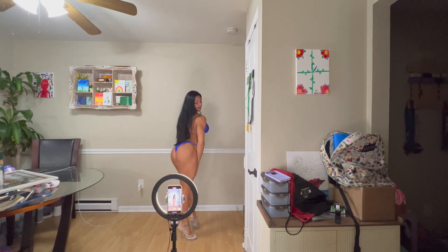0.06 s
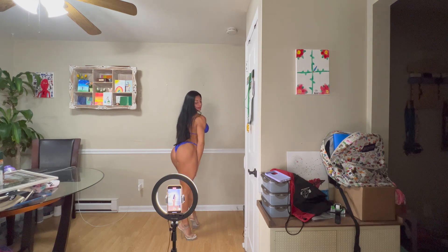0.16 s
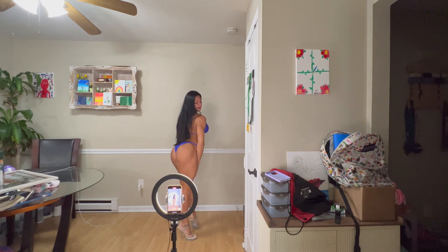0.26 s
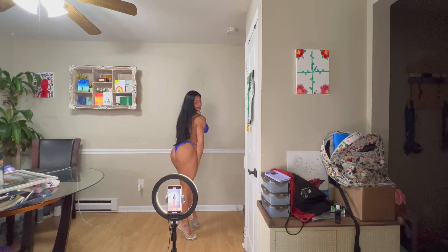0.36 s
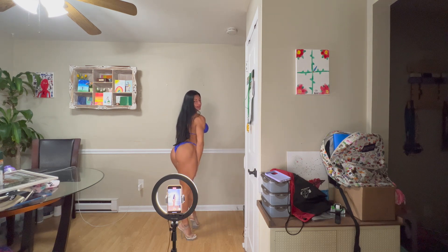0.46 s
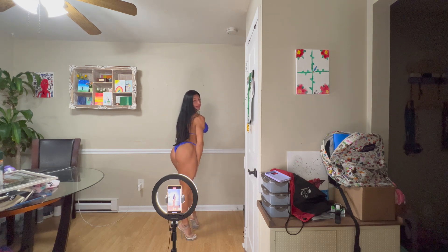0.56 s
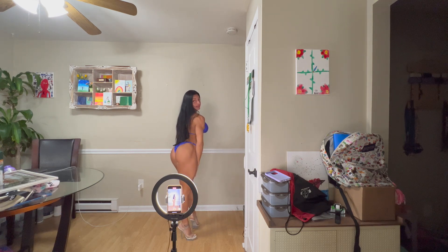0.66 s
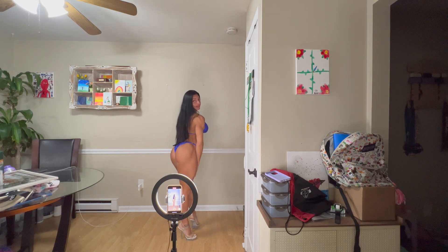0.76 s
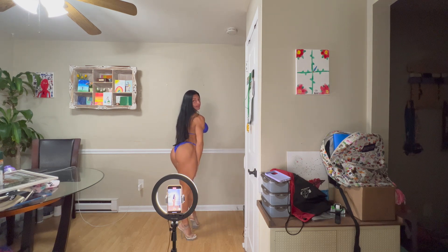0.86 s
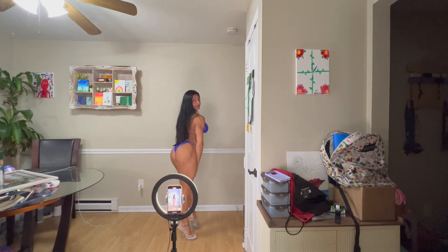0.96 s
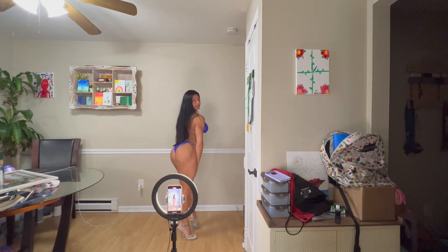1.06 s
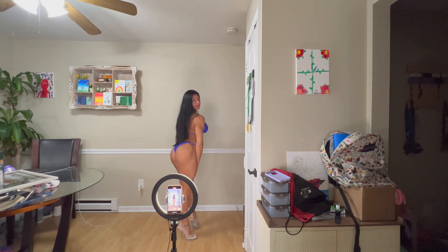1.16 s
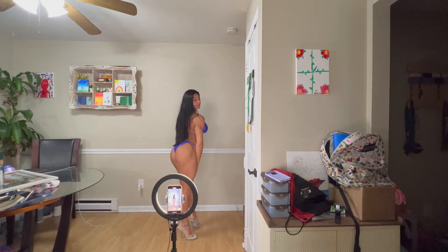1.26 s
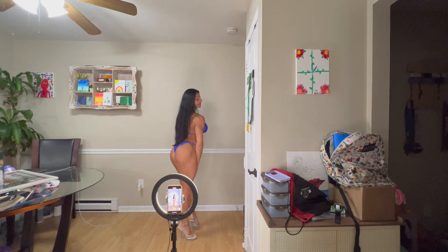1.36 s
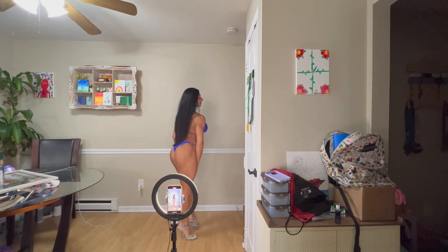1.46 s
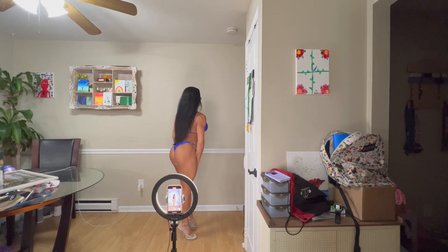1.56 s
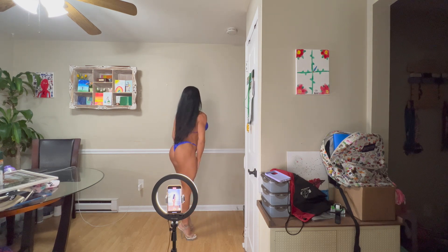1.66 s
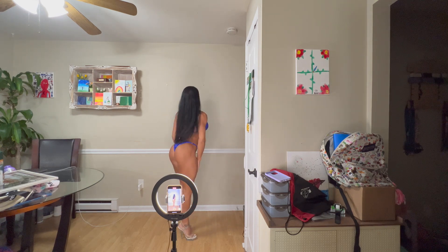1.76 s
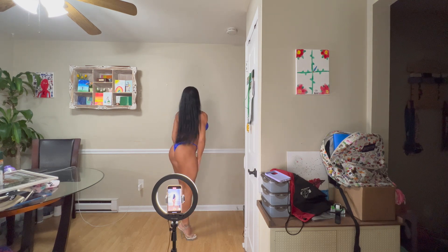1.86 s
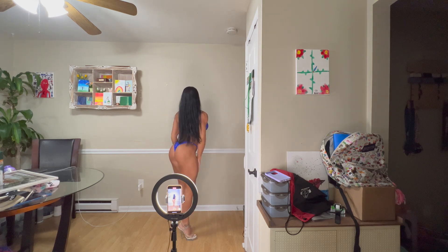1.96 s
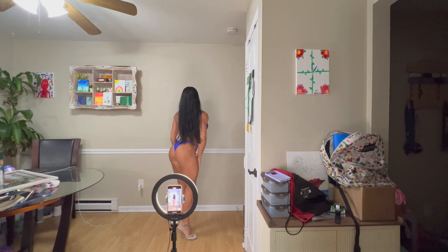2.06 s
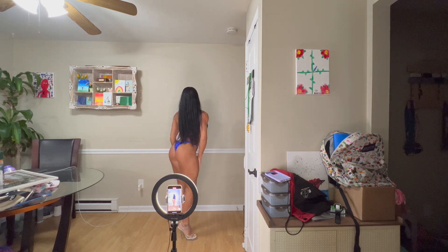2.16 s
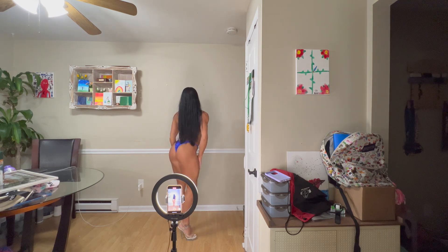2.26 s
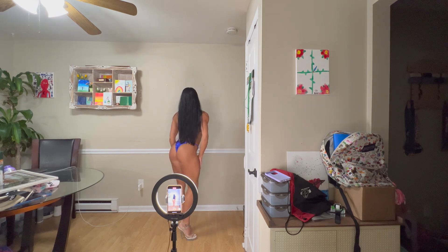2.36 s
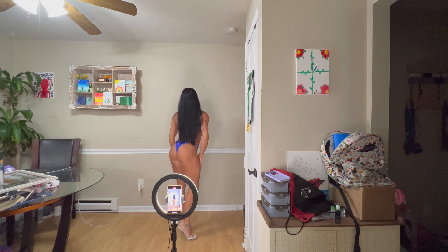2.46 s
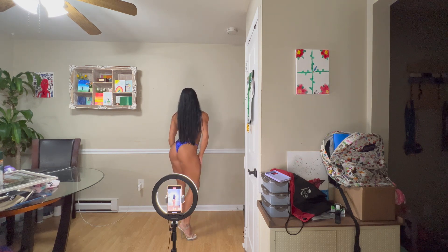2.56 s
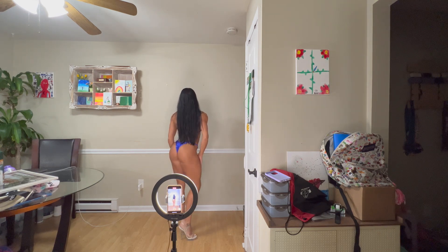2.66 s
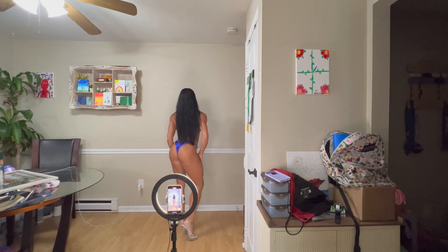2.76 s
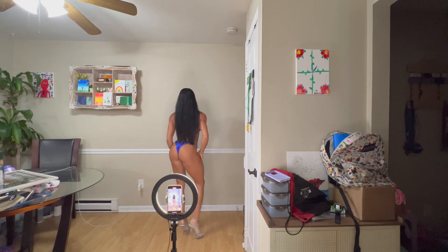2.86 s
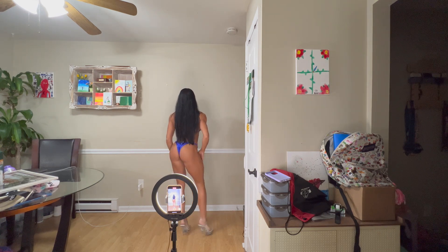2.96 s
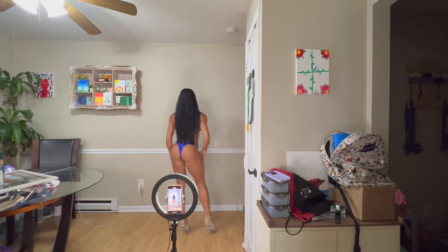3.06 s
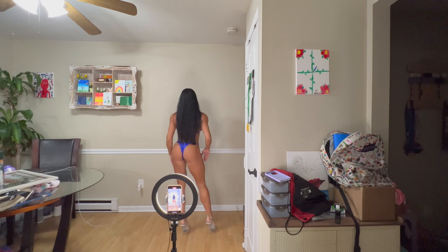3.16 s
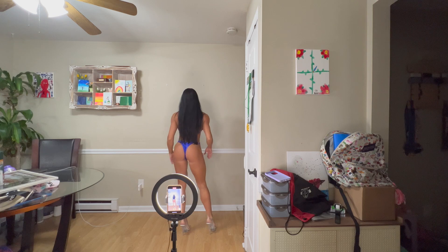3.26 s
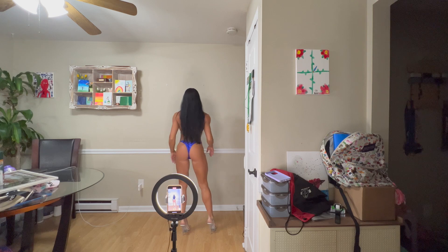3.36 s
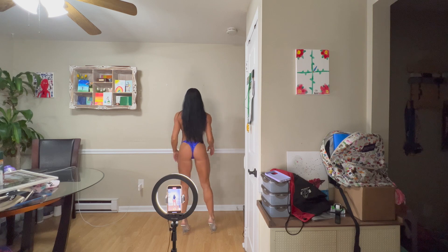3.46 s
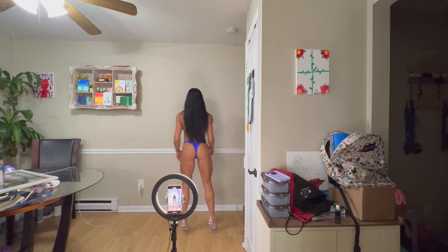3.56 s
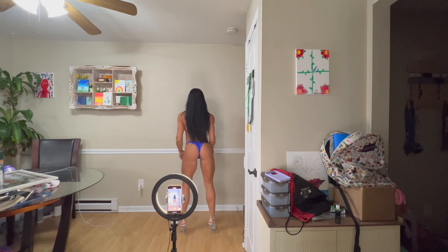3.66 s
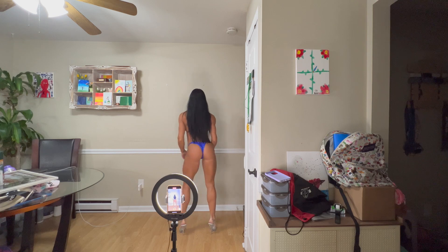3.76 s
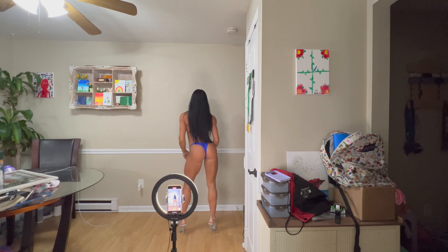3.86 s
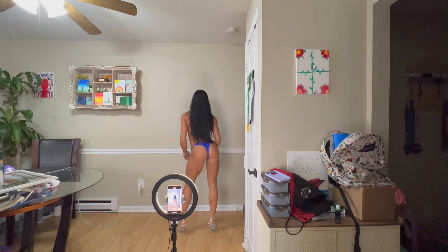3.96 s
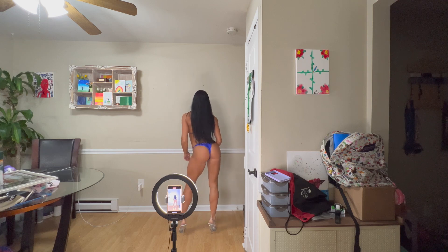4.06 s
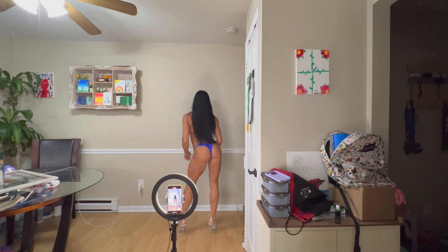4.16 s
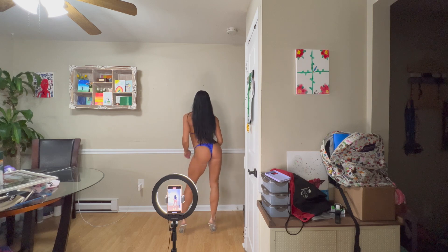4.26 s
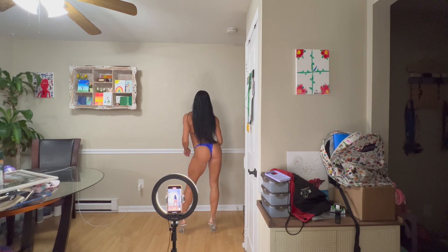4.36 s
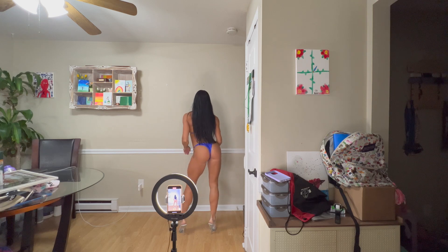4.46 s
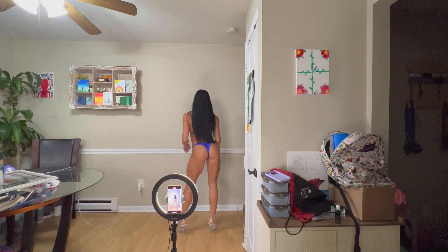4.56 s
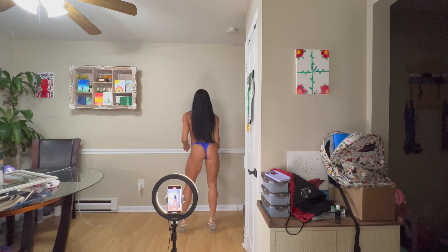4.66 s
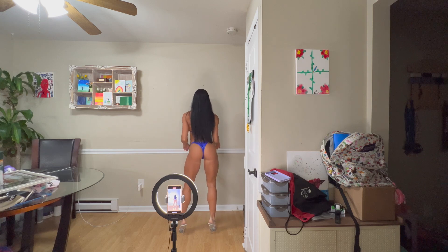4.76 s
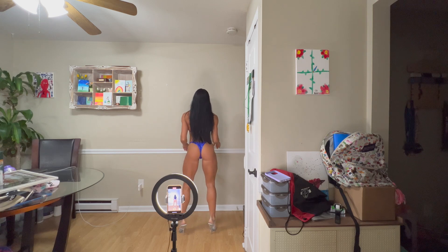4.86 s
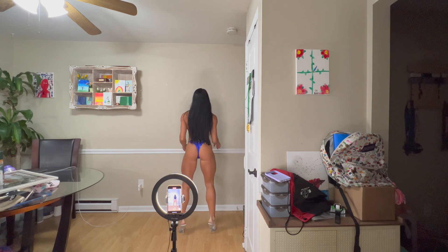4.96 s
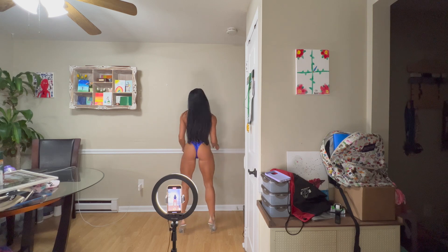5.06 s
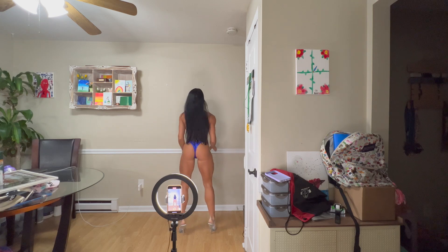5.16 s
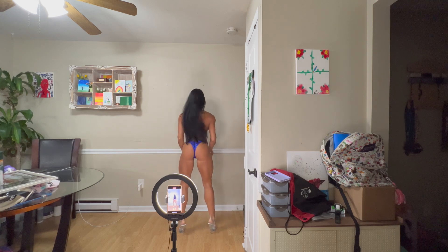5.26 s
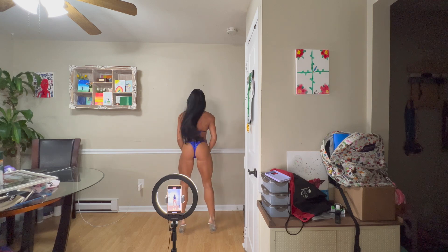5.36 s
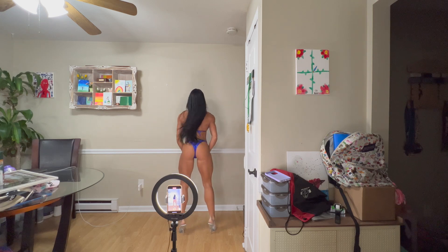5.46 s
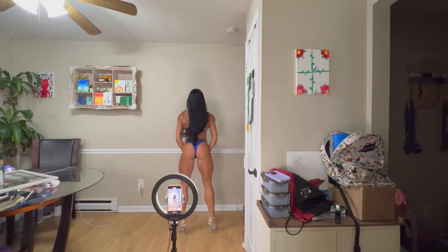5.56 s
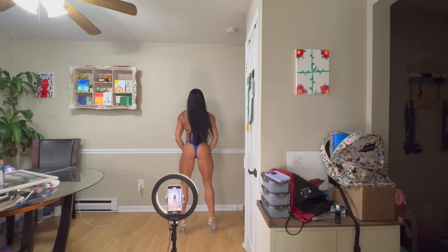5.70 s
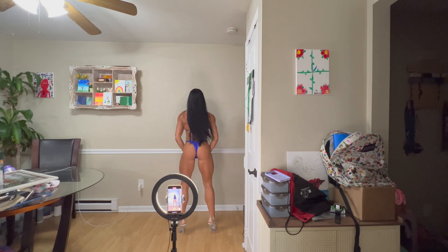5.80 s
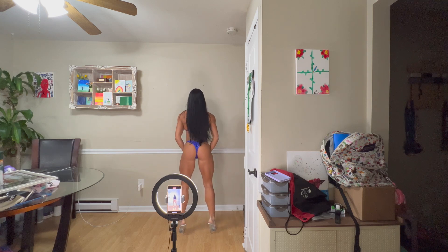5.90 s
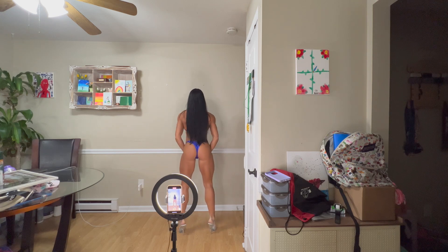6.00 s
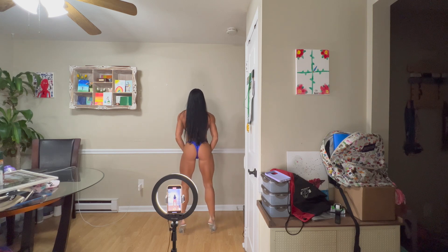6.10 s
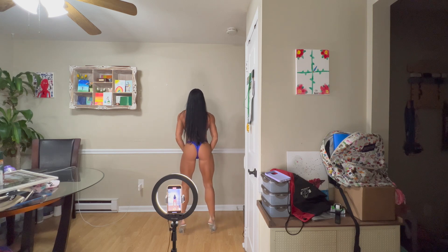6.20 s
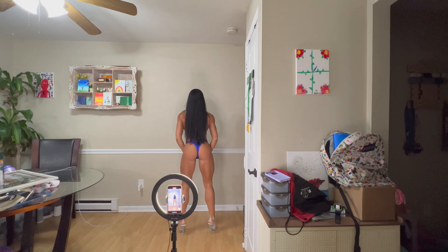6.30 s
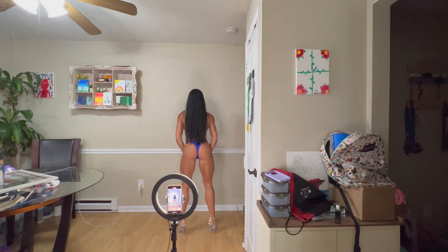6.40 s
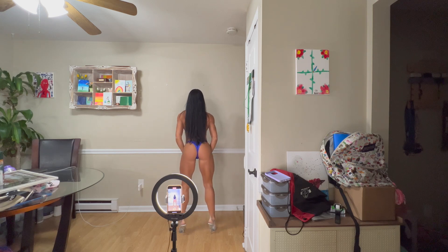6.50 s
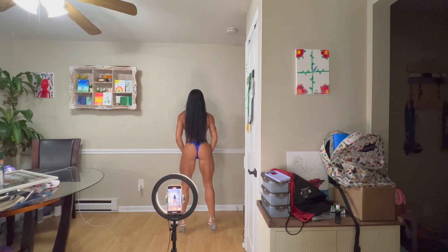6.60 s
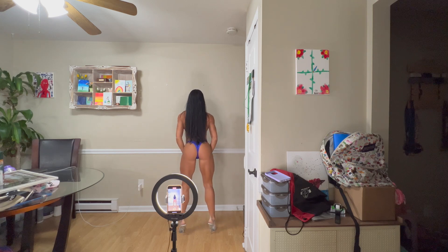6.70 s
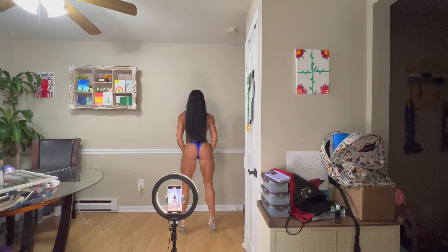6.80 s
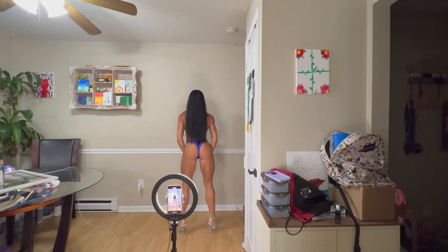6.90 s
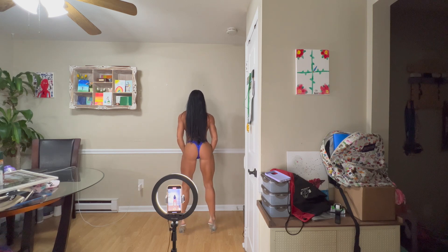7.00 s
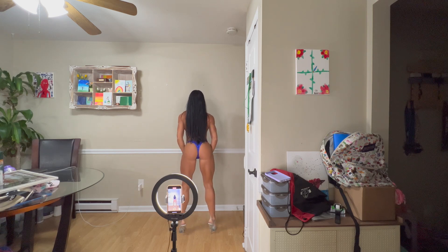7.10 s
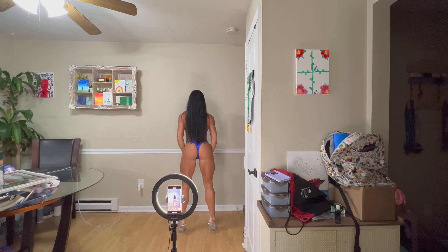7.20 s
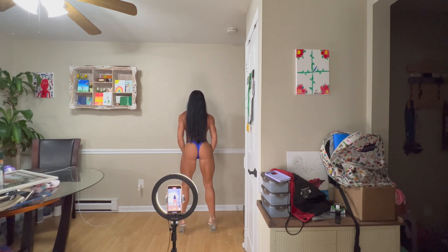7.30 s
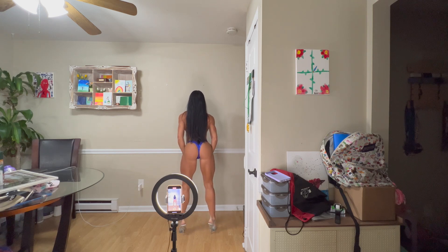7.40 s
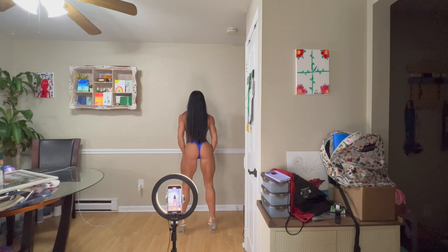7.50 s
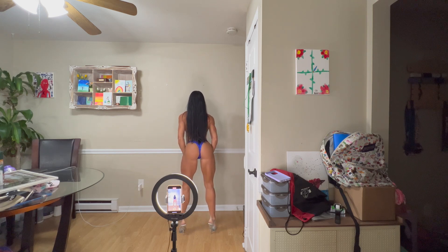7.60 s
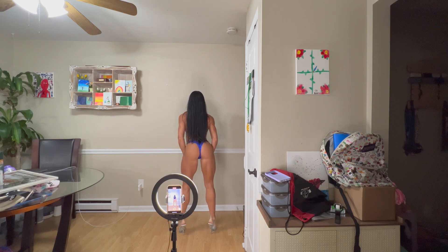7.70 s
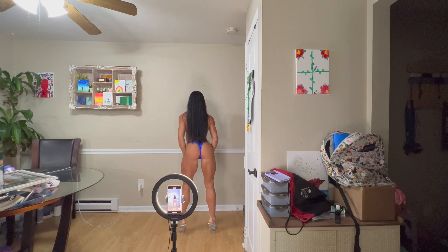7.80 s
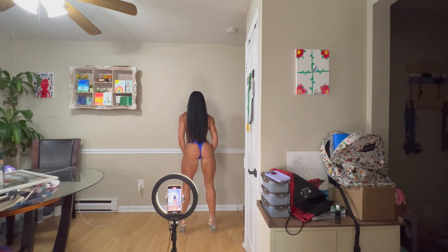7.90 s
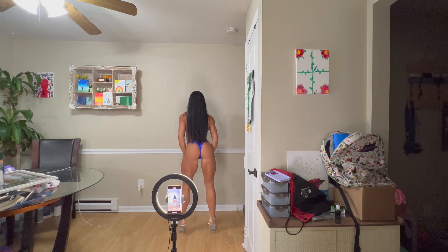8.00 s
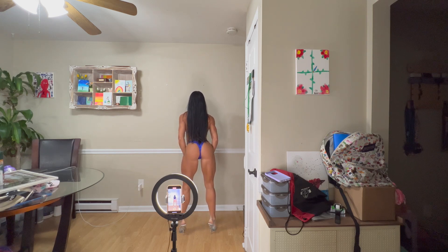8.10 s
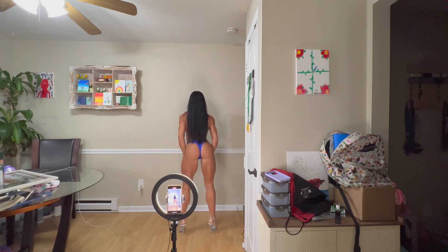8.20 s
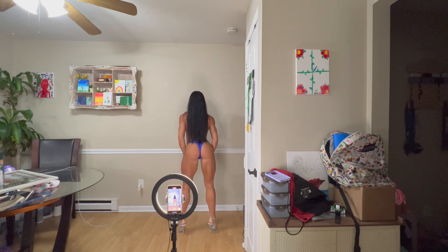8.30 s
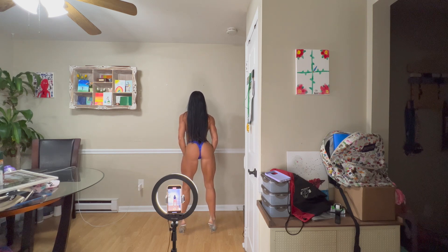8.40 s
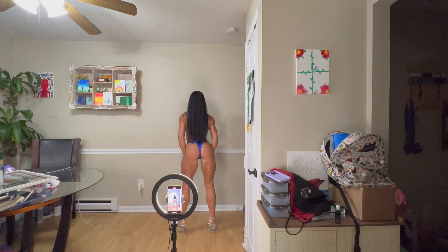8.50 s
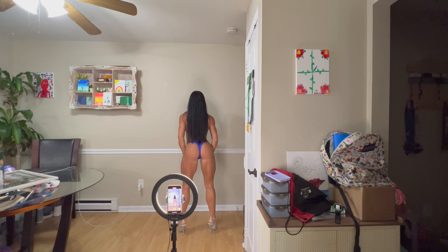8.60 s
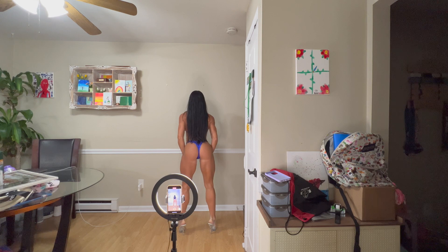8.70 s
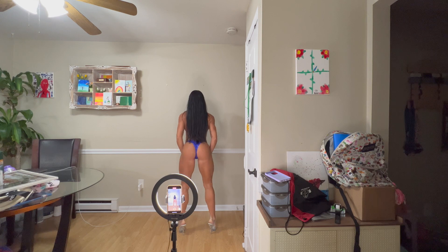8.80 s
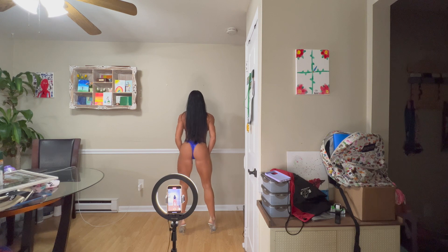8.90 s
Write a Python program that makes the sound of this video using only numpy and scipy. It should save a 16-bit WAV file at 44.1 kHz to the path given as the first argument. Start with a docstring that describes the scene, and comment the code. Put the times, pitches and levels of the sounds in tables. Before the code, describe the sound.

A furnished room with a hardwood floor, heard in stereo from a few metres. A wavering low mains hum, rumble and steady hiss run throughout, the hiss leaning right. Tiny thin squeaks come around 0.5 s, and a faint wall clock whirs and ticks every second from 0.6 s. A sole brushes softly at 1.3 s, with light heel contacts at 1.6-1.8 s. A sharp knock lands at 2.3 s, followed by gritty scuffing and short falling groans until about 3 s. A heavy, dull thud comes at 3.2 s, then a scrape at 3.5 s. Clicks cluster around 4.0-4.2 s and 4.9 s; the loudest knock hits at 5.3 s, with more at 5.7 s. Softer taps follow at 6.2 s, firmer ones at 7.0 and 7.5 s with a brief scuff, then faint touches at 8.1 and 8.6 s. A barely audible thin tone sounds at 8.9 s.

```python
"""A furnished room with a hardwood floor, high-heeled shoes a few metres from a stereo microphone.
From the start a mains hum wavers over a low rumble and a steady hiss, mostly louder on the right (tones, noise).
Brief thin tones come first (gliding sines), then a wall clock steps once a second (rattle on its modes).
Soon a sole brushes (gritty noise) and the shoes step, shuffle and pivot nearly to the end: tips click,
soles knock, boards thud (struck modes), weighted soles groan (sliding noise bands); a thin tone comes last."""
import sys
import numpy as np
from scipy import signal
from scipy.fft import rfft, irfft, next_fast_len
from scipy.io import wavfile
from scipy.ndimage import uniform_filter1d

SR = 44100
rng = np.random.default_rng(int(sys.argv[2]) if len(sys.argv) > 2 else 0)


def digitize_waveform(pressure):
    """Quantize a signal to 16-bit integers and store it at the path in sys.argv[1].

    Rows of a 2-D input are taken as channels; values are limited to [-1, 1].
    """
    field = np.atleast_2d(pressure).T
    bounded = np.clip(field, -1, 1)
    quanta = np.round(bounded * 32767).astype(np.int16)
    wavfile.write(sys.argv[1], SR, quanta)


def voltage_ratio(decibels):
    """Convert decibels (scalar or array-like) to amplitude ratios, 20 dB per decade."""
    exponent = np.asarray(decibels, float) / 20
    return 10 ** exponent


N = 394633


def evened(x):
    """Scales to rms 1."""
    return x / np.sqrt(np.mean(x ** 2) + 1e-20)


def unit(x):
    """Scales to energy 1."""
    return x / np.linalg.norm(x)


def read(points, hz):
    """Reads a table on a log frequency axis."""
    f, value = np.transpose(points)
    return np.interp(np.log(hz + 1), np.log(f + 1), value)


def add(mix, s, sound):
    """Mixes a sound in at time s."""
    part = mix[round(s * SR):][:len(sound)]
    part += sound[:len(part)]


def coloured(x, spectrum):
    """Filters the last axis by a spectrum in dB."""
    length = x.shape[-1]
    size = next_fast_len(length, True)
    gain = voltage_ratio(read(spectrum, np.fft.rfftfreq(size, 1 / SR)))
    return irfft(rfft(x, size) * gain, size)[..., :length]


def causal(spectrum, size=1024):
    """The shortest click with this spectrum (minimum phase), energy 1."""
    log_gain = np.log(voltage_ratio(read(spectrum, abs(np.fft.fftfreq(size, 1 / SR)))))
    return unit(np.fft.ifft(np.exp(np.conj(signal.hilbert(log_gain)))).real[:size // 2])


def pair(left, other, same, side):
    """Two channels with the given likeness and left-right balance at each frequency."""
    length = left.shape[-1]
    size = next_fast_len(length, True)
    hz = np.fft.rfftfreq(size, 1 / SR)
    likeness = np.clip(read(same, hz), -1, 1)
    tilt = voltage_ratio(read(side, hz) / 2)
    first = rfft(left, size)
    second = likeness * first + np.sqrt(1 - likeness ** 2) * rfft(other, size)
    return irfft(np.array([first * tilt, second / tilt]), size)[:, :length]


def slow(top_hz, low_hz=0.3105, count=24):
    """A slow random wander of rms 1: sines at random phases, weaker as they get faster."""
    t = np.arange(0, N + 64, 64) / SR
    waves = sum(np.sin(2 * np.pi * (f * t + rng.random())) / np.sqrt(f)
                for f in np.geomspace(low_hz, top_hz, count))
    return np.interp(np.arange(N) / SR, t, evened(waves))


def ringing(modes, t, detune, scatter_db):
    """Decaying sines; each blow lands on another spot, so tuning and shares shift."""
    hz, db, t60 = np.transpose(modes)[:, :, None]
    share, shift = rng.standard_normal((2, len(modes), 1))
    envelope = voltage_ratio(db + scatter_db * share - 60 * t / t60)
    return (envelope * np.sin(2 * np.pi * hz * (1 + detune * shift) * t)).sum(0)


def ring(modes, detune, scatter_db, contact_s):
    """One blow of energy 1 on a set of modes; a longer contact is duller."""
    t = np.arange(4000) / SR
    push = np.sin(np.pi * np.clip(t[:400] / contact_s, 0, 1)) ** 2
    push += (t[:400] == 0) * 1e-9  # never quite empty
    return unit(signal.fftconvolve(ringing(modes, t, detune, scatter_db), push))


def tip_click(spectrum, t60, chatter):
    """The hard heel tip cracks, then chatters on the varnish for a few milliseconds."""
    t = np.arange(600) / SR
    crack = (t == 0) + chatter * rng.standard_normal(600) * voltage_ratio(-60 * t / t60)
    return unit(np.convolve(crack, causal(spectrum)))


# Footfalls: t/s, blow level/dB, flatness (sole over heel stem)/dB,
# weight (drives boards and floor, relative to blow)/dB, hardness (tip click over blow)/dB
FOOTFALLS = [(1.6, -66, 7, -15, 4), (1.783, -55.5, 11, 18.5, -10), (1.807, -49.5, 6, 6, -11.5),
             (2.325, -31.5, -5, -1, -4.5), (2.786, -55.5, -17.5, 12, 1.5), (3.103, -56.5, 6, -6, 1),
             (3.205, -34, 14.5, 10.5, -20), (3.364, -83.5, -23.5, -8.5, 7.5), (3.928, -79, -6, -9, 1),
             (3.975, -58, 7, -4, 3), (4.032, -41.5, 5.5, -15, -1), (4.12, -39.5, 3, -32, 0.5),
             (4.239, -46, 2.5, -14, 3), (4.72, -76.5, -12, 1.5, 15), (4.812, -80.5, -19, -5, 8.5),
             (4.835, -56, 5, -9, -6), (4.869, -42, 4, -20, -7.5), (5.2886, -48, 4, -10, -4),
             (5.2923, -38, -4, -4, 4), (5.335, -26.5, 8, -39, -9), (5.647, -32, 8.5, -43, -9),
             (5.726, -34.5, 2.5, -2, -4), (6.212, -58, 5, 3, -6), (6.88, -61, -2.5, -23, -1.5),
             (6.94, -52.5, -6, -16, -12), (6.983, -41.5, 4.5, -8, -4), (7.308, -53, 0.5, 0, -10.5),
             (7.458, -38.5, 3, -10, -18), (7.506, -37, 2, -5, -11.5), (8.083, -61.5, 0, 1, -1),
             (8.588, -62.5, -10, -3, -1)]
# Modes of the floor boards: f/Hz, level/dB, t60/s
BOARD_MODES = [(60.5, -29, 0.057), (115, -5.5, 0.27), (162, 1.5, 0.19), (200, 9.5, 0.073), (245, 6, 0.082),
               (323, 7, 0.037)]
# Modes of the thick sole: f/Hz, level/dB, t60/s
SOLE_MODES = [(480, -2.5, 0.038), (595, -18.5, 0.078), (672, 9.5, 0.078), (806, 18.5, 0.016),
              (903, 17, 0.025), (1073, 12.5, 0.037), (1116, 3, 0.043)]
# Modes of the heel stem: f/Hz, level/dB, t60/s
STEM_MODES = [(1057, 16.5, 0.025), (1310, 17, 0.021), (1475, 14, 0.014), (1640, 1, 0.062),
              (2155, -5.5, 0.011)]
# Modes of the hard heel cap: f/Hz, level/dB, t60/s
CAP_MODES = [(2653.6, 21.5, 0.023), (3160, 2, 0.0072), (3680, 1.5, 0.036), (4860, -41, 0.0277)]
# Body of the tip click: f/Hz, level/dB per Hz
CLICK_BODY = [(1500, -11.5), (2600, 4.5), (3600, 6), (5200, 2), (7000, -2), (10000, -48.5)]
# Top of the tip click as heard, with gaps near 10.6 and 14 kHz: f/Hz, level/dB per Hz
GAPPED_CLICK_TOP = [(4500, -23), (6500, -0.5), (8000, -5), (9200, -2.5), (10600, -35.5), (11900, -6),
                    (14000, -36), (15100, -5.5), (16500, -48.5)]


def steps():
    """Each footfall excites boards, sole, stem and tip in its own proportion."""
    cap_db = -11  # over the click
    bright_db, dull_per_flat_db = -10.5, 0.8254  # top under body, more so when the sole lands flat
    boards, shoes = np.zeros((2, N))
    for s, blow_db, flat_db, weight_db, hard_db in FOOTFALLS:
        add(boards, s, voltage_ratio(blow_db + weight_db + 0.5) * ring(BOARD_MODES, 0.08, 0.56, 0.0025))
        contact_s = 0.00043 + 0.00005 * np.clip(flat_db, 0, 20)  # a flat sole lands more softly
        add(shoes, s, voltage_ratio(blow_db + flat_db / 2) * ring(SOLE_MODES, 0.03, 1.5, contact_s))
        add(shoes, s, voltage_ratio(blow_db - flat_db / 2) * ring(STEM_MODES, 0.03, 1.5, 0.0003))
        click_db = blow_db + hard_db
        top_db = click_db + bright_db - dull_per_flat_db * flat_db
        add(shoes, s, voltage_ratio(click_db) * tip_click(CLICK_BODY, 0.005, 0.08))
        add(shoes, s, voltage_ratio(click_db + cap_db) * ring(CAP_MODES, 0.01, 2.5, 0.0001))
        add(shoes, s, voltage_ratio(top_db) * tip_click(GAPPED_CLICK_TOP, 0.002, 0.1))
    # a shoe is too small to radiate bass
    return boards + signal.sosfilt(signal.butter(2, 280, "high", fs=SR, output="sos"), shoes)


# Joists that ring on under the boards: f/Hz, level/dB, t60/s
JOIST_MODES = [(62.4, -10, 0.26), (123.4, -8, 0.27), (158, -4, .2), (197.4, 1.5, 0.22), (246.4, -3, 0.2),
               (307.6, -6.5, .15)]


def thuds():
    """The joists carry part of each footfall straight to the microphone: it swells, then rings down."""
    floor_db, rise_s = 29, 0.0086
    out = np.zeros(N)
    t = np.arange(SR // 2) / SR
    for s, blow_db, _, weight_db, _ in FOOTFALLS:
        thud = unit(ringing(JOIST_MODES, t, 0.024, 1.5) * np.minimum(t / rise_s, 1))
        add(out, s, voltage_ratio(blow_db + weight_db + floor_db) * thud)
    return out


# Strokes of a sole on the floor: t/s, length/s, sheen level/dB (relative), then over the sheen:
# highest band level/dB, scrape level/dB, rumble under weight level/dB
STROKES = [(1.28, 0.445, -53, -8, -0.5, 1), (1.875, 0.15, -60, -2, 0.5, -5),
           (2.474, 0.14, -54.5, -6, 6.5, 10), (2.555, 0.24, -45, 3, 2.5, 5),
           (2.74, 0.135, -46, -26, -10, 9), (3.458, 0.31, -43.5, -8, 3.5, 1.5),
           (3.867, 0.12, -54.5, -4, -7, 7), (4.229, 0.045, -64, 0, -4, 3), (4.7, 0.115, -68, -6, -11, -6.5),
           (5.573, 0.12, -50, -9, 2.5, 10), (5.747, 0.13, -72, -9.5, 2, 32.5),
           (7.246, 0.076, -53, -16, -4, 4), (7.31, 0.073, -66, 1, 10, 26.5), (7.597, 0.12, -77, 1, -9, 18)]
# Sheen of the brushing: f/Hz, level/dB per Hz
SHEEN = [(3500, -24), (4800, 5), (6500, 1), (7800, 0.5), (9000, -38), (10000, -59)]
# Highest band of the brushing as heard, with gaps near 10.8 and 13.8 kHz: f/Hz, level/dB per Hz
GAPPED_HIGHEST_BAND = [(6500, -26), (8200, 9), (9500, 12.5), (10800, -72), (11800, 13.5), (13800, -54),
                       (14800, 5), (16500, -24)]
# Scrape of the brushing: f/Hz, level/dB per Hz
SCRAPE = [(1000, -16), (1800, 0), (2600, -4.5), (3600, -2.5), (4800, -11.5), (7000, -52)]
# Rumble under a weighted sole: f/Hz, level/dB per Hz
SOLE_RUMBLE = [(100, -27), (300, 4), (500, 6.5), (900, 1.5), (1400, 1), (4000, -68)]


def brushes():
    """Dense grit under a turning sole: sheen, a gapped highest band, scrape, and rumble under weight."""
    edge_db = -13  # start and end of a stroke's swell, under its top
    lean, roundness = 1.16, 0.48  # lean over 1: late top; roundness under 1: held longer
    settle = 0.25  # share of a stroke spent settling onto the floor
    # the sole grips and lets go unevenly, each band in its own way
    stutter_db = 2.2 * np.array([slow(50, low_hz=13) for _ in range(4)])
    grit = rng.standard_normal((4, N)) * voltage_ratio(4.52 * rng.exponential(1, N) + stutter_db)
    colours = (SHEEN, GAPPED_HIGHEST_BAND, SCRAPE, SOLE_RUMBLE)
    layers = np.array([evened(coloured(g, c)) for g, c in zip(grit, colours)])
    out = np.zeros(N)
    for s, length, sheen_db, *over_db in STROKES:
        along = np.arange(0, length, 1 / SR) / length
        swell_db = edge_db * (1.5 - np.sin(np.pi * along ** lean) ** roundness)
        stroke = voltage_ratio(sheen_db + swell_db) * np.minimum(along / settle, 1)
        rubbed = voltage_ratio([0, *over_db]) @ layers[:, round(s * SR):][:, :len(along)]
        add(out, s, stroke * rubbed)
    return out


# Weighted soles drag and the boards groan: t/s, length/s, level/dB (relative), start f/Hz, end f/Hz
GROANS = [(2.499, .2, -56.5, 498.5, 331), (2.773, 0.071, -59, 840, 790), (2.779, 0.067, -57, 437, 420),
          (2.855, .22, -49, 561, 358)]


def drags():
    """Rough noise in one resonance that slides as the weight shifts."""
    r = np.exp(-np.pi * 330 / SR)  # 330 Hz wide for one pole; the two in a row are narrower
    out = np.zeros(N)
    for s, length, db, from_hz, to_hz in GROANS:
        along = np.arange(0, length, 1 / SR) / length
        noise = rng.standard_normal((2, 12000))
        band = evened(signal.lfilter([1], [1, -2 * r, r * r], noise)[:, -len(along):])
        phase = 2 * np.pi * np.cumsum(from_hz + (to_hz - from_hz) * along) / SR
        groan = band[0] * np.cos(phase) + band[1] * np.sin(phase)  # low noise moved up to the pitch
        add(out, s, voltage_ratio(db) * np.sin(np.pi * along ** 0.57) * groan)
    return out


# Brief thin tones: squeaks, a heel tip's ring, and falling tones around a clock tock:
# t/s, f/Hz, level/dB (relative), length/s, end over start pitch
THIN_TONES = [(0.467, 3270, -70, 0.026, 0.95), (0.518, 2562, -63.5, 0.027, 0.964),
              (1.601, 1480, -59, 0.047, 0.95), (1.612, 1077, -58, 0.096, 0.92),
              (1.673, 1330, -64, .08, .97), (1.68, 922, -56, .09, .94), (3.111, 3200, -54, 0.0095, 0.88),
              (3.395, 3080, -71, 0.046, 0.994), (3.46, 3200, -64, 0.03, 0.87),
              (8.885, 3090, -61.5, 0.08, 1.001)]


def thin_tones():
    """Short thin tones roughened by a phase wobble; most sag in pitch."""
    out = np.zeros(N)
    for s, hz, db, length, glide in THIN_TONES:
        t = np.arange(0, length, 1 / SR)
        wobble = 0.6 * evened(uniform_filter1d(rng.standard_normal(6000), 150))[:len(t)]  # radians
        glided = t + (glide - 1) * t ** 2 / (2 * length)
        tone = np.sin(2 * np.pi * hz * glided + wobble)
        add(out, s, voltage_ratio(db) * unit(np.sin(np.pi * t / length) * tone))
    return out


# Modes of the wall clock's case: f/Hz, level/dB, t60/s
CASE_MODES = [(850, -3, 0.011), (1060, -10.5, 0.018), (1320, -8.5, 0.044), (1703, 1.5, 0.0023)]
# Modes of its gears: f/Hz, level/dB, t60/s
GEAR_MODES = [(4110, -3, 0.017), (4600, -14, 0.0027), (4900, 1, 0.0066), (5830, -8.5, 0.014)]


def whir(modes, length, lean):
    """A sparse random rattle that swells and sinks, ringing a set of modes; energy 1."""
    t = np.arange(5000) / SR
    swell = abs(np.sin(np.pi * np.clip(t / length, 0, 1) ** lean)) ** 0.49
    rattle = rng.standard_normal(5000) * (rng.random(5000) < 0.15) * swell
    return unit(signal.fftconvolve(rattle, ring(modes, 0.0065, 1.0, 0.0001)))


def clock():
    """The movement whirs for a moment as the hand steps: the case first, the gears just after."""
    first_s, gap_s = 0.614, 1.0
    out = np.zeros(N)
    for k, s in enumerate(np.arange(first_s, N / SR, gap_s)):
        second = k % 2  # every second step is duller and softer
        add(out, s, voltage_ratio(-49.5 - 3 * second) * whir(CASE_MODES, 0.1, 1))
        add(out, s + 0.012, voltage_ratio(-53.5 - 11.5 * second) * whir(GEAR_MODES, 0.08, 0.5))
    return out


# Broad appliance hiss as heard, its treble thinned: f/Hz, level/dB per Hz
THINNED_HISS = [(100, -68), (200, -1.5), (350, -11), (800, -14.5), (1300, -20.5), (1600, -10.5), (1900, -7),
                (2150, -12), (2400, -24.5), (3200, -28), (6500, -26.5), (8000, -29.5), (9500, -46.5),
                (13000, -35.5), (14500, -79), (17000, -64)]
# Low appliance rumble: f/Hz, level/dB per Hz
RUMBLE_COLOUR = [(15, -67), (38, -18), (60, 0.5), (80, -10.5), (105, -8.5), (140, -4.5), (170, -17),
                 (400, -104)]
# Mains hum: f/Hz, level/dB
HUM_TONES = [(59.5, -61), (119.5, -43.5)]
# Left-right likeness of hiss and rumble: f/Hz, likeness (-1 to 1)
STEADY_SAME = [(60, 0.6), (180, 0.333), (550, -0.33), (1650, -0.014), (4970, 0.15), (15000, 0.079)]
# Left-right balance of hiss and rumble: f/Hz, left minus right level/dB
STEADY_SIDE = [(60, -4), (130, 3.5), (290, -4), (640, 1), (1410, -15), (3100, -7.5), (6820, -13),
               (15000, 7.5)]


def steady_noise(colour):
    """Stereo noise of one colour, its mid signal scaled to rms 1."""
    a, b = rng.standard_normal((2, N))
    noise = pair(coloured(a, colour), coloured(b, colour), STEADY_SAME, STEADY_SIDE)
    return noise / np.std(noise.mean(0))


def appliance():
    """Mains hum that wavers, a low rumble and a broad hiss, humped near 2 kHz and thinned in the treble."""
    t = np.arange(N) / SR
    hiss = voltage_ratio(-54.5 + 0.7 * slow(7.6)) * steady_noise(THINNED_HISS)
    rumble = voltage_ratio(-48) * steady_noise(RUMBLE_COLOUR)
    hum = np.zeros(N)
    for hz, db in HUM_TONES:
        waver_db = 4 * np.tanh(0.6 * slow(6))
        tone = np.sqrt(2) * np.sin(2 * np.pi * hz * t + 0.17 * slow(3.0))
        hum += voltage_ratio(db + waver_db) * tone
    return hiss + rumble + hum * voltage_ratio([[-1.1], [1.1]])  # hum leans right


# Straight path, which carries little bass: f/Hz, level/dB
STRAIGHT_COLOUR = [(300, -5), (900, 6.5), (2500, 4), (7000, 3)]
# Left-right likeness of the straight path: f/Hz, likeness (-1 to 1)
STRAIGHT_SAME = [(250, 0.53), (650, 0.088), (1500, 1), (3500, 0.922)]
# First echoes of the straight path: delay t/s, level/dB
FIRST_ECHOES = [(.0041, -11.5), (.0066, -8.5), (.0135, -7), (.019, -4), (.025, -2.5)]
# Decay of the furnished room: f/Hz, t60/s
ROOM_DECAY = [(100, 0.51), (260, 0.46), (700, 0.39), (1840, 0.46), (4850, 0.48), (12000, 0.33)]
# Left-right likeness of the room sound: f/Hz, likeness (-1 to 1)
TAIL_SAME = [(130, 0.95), (290, 0.46), (640, -0.27), (1400, 0.26), (5000, -0.18), (8000, 0.097),
             (12000, -0.073)]
# Balance of the microphone's two sides: f/Hz, left minus right level/dB
MIC_SIDES = [(200, -1), (1300, -3), (2400, 1.5), (4400, -8), (7000, -13), (9000, 0.5)]


def straight_path(direct):
    """The path from floor to microphone, then its first echoes with alternating sign."""
    path = np.roll(np.pad(direct * causal(STRAIGHT_COLOUR), (0, 1536)), 64)
    echoes = sum((-1) ** k * voltage_ratio(db) * np.roll(path, round(s * SR))
                 for k, (s, db) in enumerate(FIRST_ECHOES))
    path = path + echoes
    return pair(path, np.roll(path, 9), STRAIGHT_SAME, MIC_SIDES)


def room_tail(gap_s, build_s):
    """Sparse random echoes on two channels, dying band by band."""
    t = np.arange(SR) / SR
    taps = np.zeros((2, SR))
    at = np.arange(0, SR - 20, 20) + rng.integers(0, 20, (2, (SR - 1) // 20))
    np.put_along_axis(taps, at, rng.choice([-1., 1.], at.shape), 1)
    hz, frame_s, z = signal.stft(taps, SR, nperseg=256)
    decay = voltage_ratio(-60 * frame_s / read(ROOM_DECAY, hz)[:, None])
    tail = signal.istft(z * decay, SR, nperseg=256)[1][:, :SR]
    tail *= np.clip((t - gap_s) / build_s, 0, 1)  # echoes thicken
    tail *= voltage_ratio(1.5 * np.exp(-(t / 0.035) ** 2))  # the nearest surfaces answer more strongly
    tail /= np.sqrt(np.mean(tail[:, :1500] ** 2))
    return pair(*tail, TAIL_SAME, MIC_SIDES)


def room(x, direct, gap_s, build_s, count=3):
    """Straight sound with first echoes, then three tails in turn, as the feet move about."""
    out = signal.fftconvolve(x[None], straight_path(direct), axes=1)[:, 64:N + 64]
    turn = np.arange(N) / SR * 7.3  # radians
    for k in range(count):
        share = np.sqrt(2 / count) * np.cos(turn + np.pi * k / count)
        out += signal.fftconvolve((x * share)[None], room_tail(gap_s, build_s), axes=1)[:, :N]
    return out


def scene():
    """Shoes, thin tones and clock in the room, over the appliance."""
    sliding = (brushes() + drags()) / np.sqrt(0.06 * SR)  # steady sound piles up over the tail's length
    ticking, thin = clock(), thin_tones()
    near = 34.7 * ticking + voltage_ratio(23.5) * thin  # much of these arrives straight
    near = pair(near, np.roll(near, 40), TAIL_SAME, MIC_SIDES)
    in_room = steps() + sliding + thin + 0.31 * ticking
    return room(in_room, 9.44, 0.00015, 0.0018) + near + thuds() + appliance()


# Bass roll-off of the microphone: f/Hz, level/dB
MIC_BASS = [(15, -38), (30, -5), (50, -1.5)]


def microphone(x):
    """The microphone loses the lowest bass."""
    return coloured(x, MIC_BASS)


# How far the noise suppressor lowers the steady floor: f/Hz, reduction/dB
FLOOR_CUT = [(200, 3.5), (600, 4.5), (16000, 3.5)]


def suppress(x, threshold_db, soft_db):
    """Noise suppressor: what sinks close to the steady floor is lowered, so tails end early."""
    hz, _, z = signal.stft(x, SR, nperseg=512, noverlap=384)
    power = uniform_filter1d((abs(z) ** 2).mean(0), size=9, axis=0)
    power = uniform_filter1d(power, size=5, axis=1)
    steady = np.median(power, axis=1)[:, None]
    over_db = 10 * np.log10(abs(power) / steady + 1e-9)
    shut = 1 / (1 + np.exp(np.clip((over_db - threshold_db) / soft_db, -30, 30)))
    lowered = z * voltage_ratio(-read(FLOOR_CUT, hz)[:, None] * shut)
    return signal.istft(lowered, SR, nperseg=512, noverlap=384)[1][:, :N]


def band_limit(x):
    """A steep low-pass at the top of the band."""
    return signal.sosfilt(signal.butter(12, 16950, fs=SR, output="sos"), x)


def record(dry):
    """The microphone's roll-off, then the noise suppressor."""
    finished = suppress(microphone(dry), 4.5, 2.0)
    return band_limit(finished)


dry = scene()
out = record(dry)
digitize_waveform(out)
```